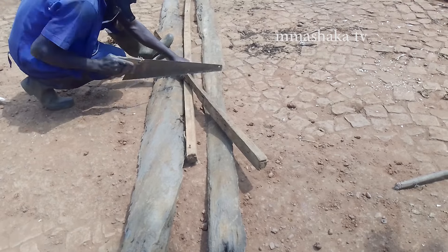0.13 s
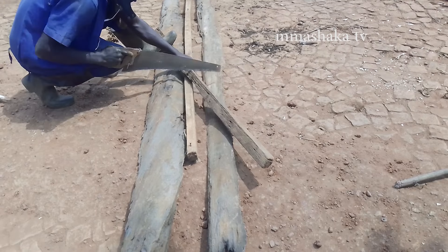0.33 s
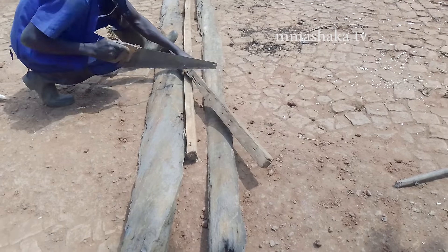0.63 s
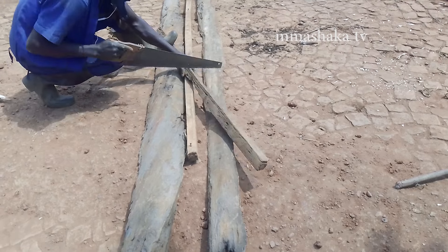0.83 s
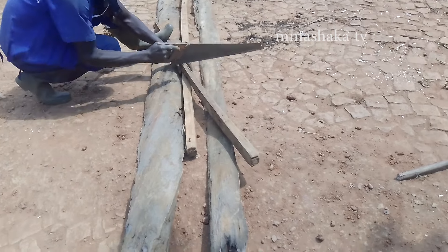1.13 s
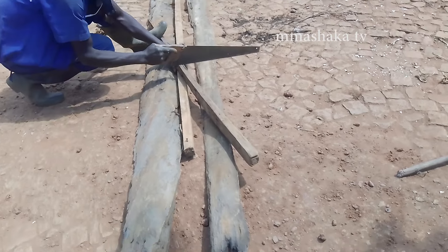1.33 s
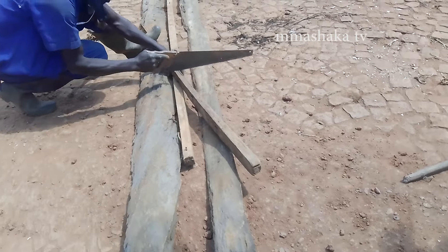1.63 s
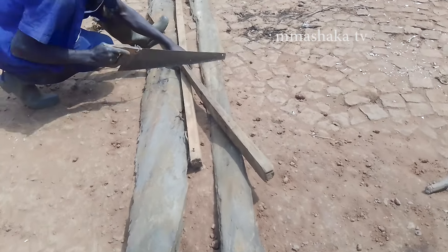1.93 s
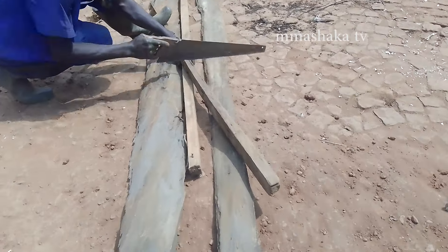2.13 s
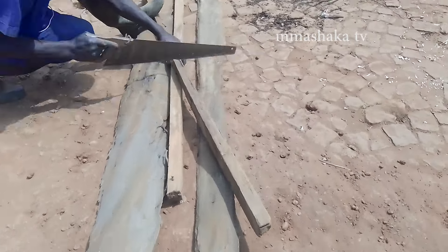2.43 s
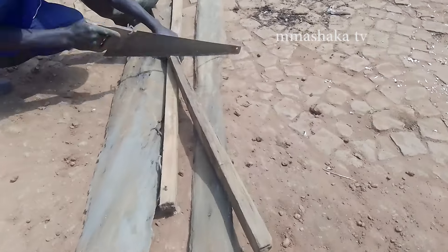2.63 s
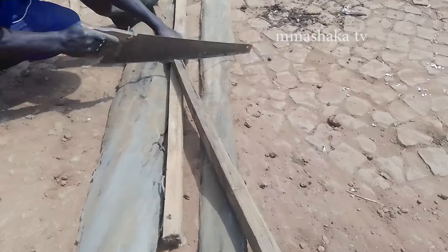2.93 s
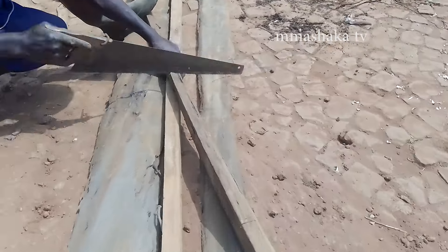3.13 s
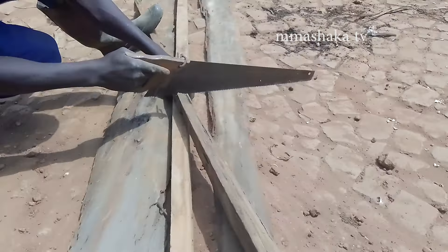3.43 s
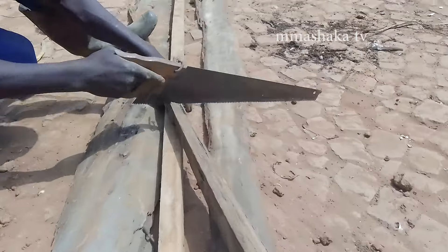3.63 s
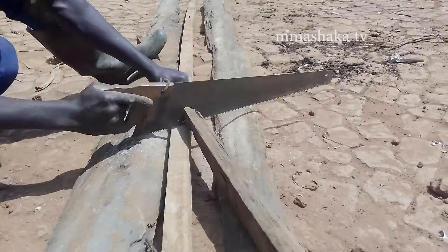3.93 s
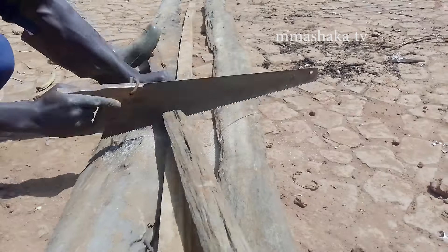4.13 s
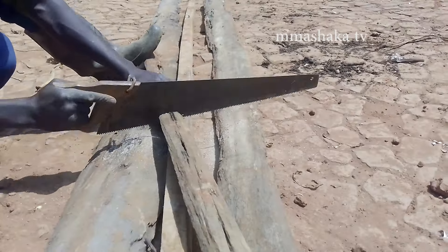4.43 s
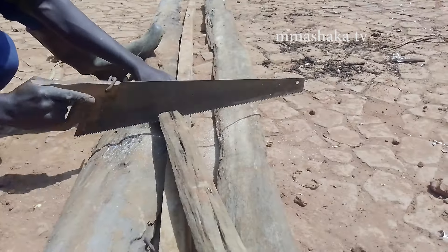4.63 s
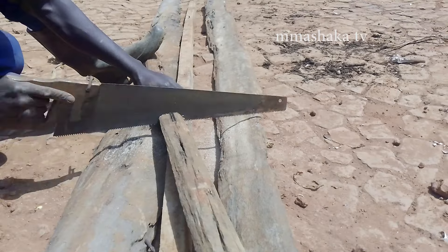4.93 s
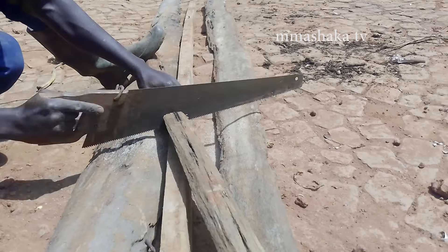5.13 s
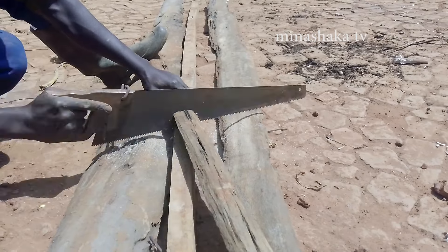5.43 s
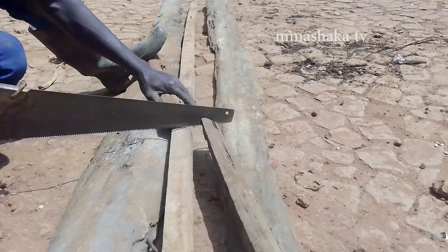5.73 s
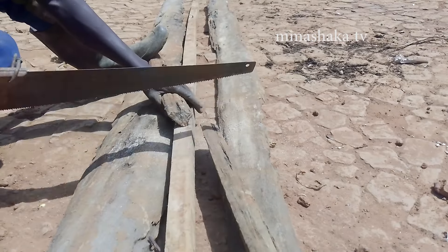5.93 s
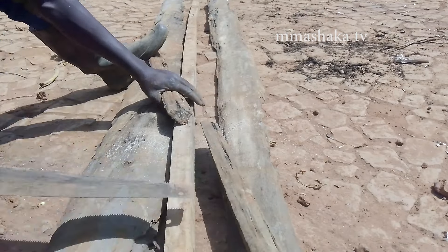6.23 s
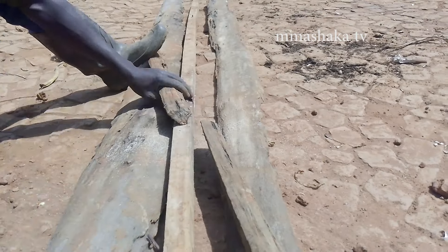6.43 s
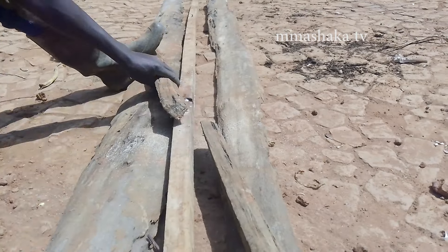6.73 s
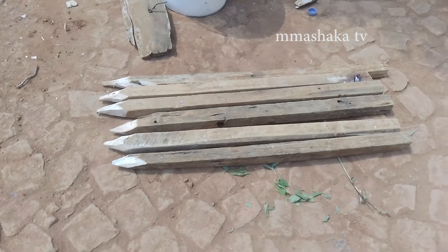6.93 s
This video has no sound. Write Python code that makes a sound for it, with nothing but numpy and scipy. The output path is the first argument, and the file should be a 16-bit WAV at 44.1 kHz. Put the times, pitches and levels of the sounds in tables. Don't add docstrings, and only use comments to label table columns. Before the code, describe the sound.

A hand saw rasps through a wooden bar in short uneven strokes with pauses, then the piece drops with a hard hollow knock outdoors.

```python
import sys
import numpy as np
from scipy import signal
from scipy.fft import rfft, irfft
from scipy.io import wavfile
from scipy.ndimage import uniform_filter1d

SR = 44100
rng = np.random.default_rng(int(sys.argv[2]) if len(sys.argv) > 2 else 0)


def boost(x):
    u = np.asarray(x, float) / 20
    return 10 ** u


def dump_mix(stems):
    frames = np.atleast_2d(stems).T
    limited = np.clip(frames, -1, 1)
    pcm = np.round(limited * 32767).astype(np.int16)
    wavfile.write(sys.argv[1], SR, pcm)


N = 313851

# [pitch_hz, level_db per Hz]
RASP_COLOUR = [(1410, -28), (2400, -5), (3260, -9.5), (4010, -3.5), (4520, -13.5), (5480, -5.5),
               (6130, -4.5), (7440, 1), (10500, -9.5), (11700, -4), (12900, -22), (14100, -15.5),
               (14900, -17.5), (15700, -10)]
# [pitch_hz, width_hz, level_db]
STEEL_MODES = [(3420, 25, -7), (4165, 22, 0), (5600, 88, 5.5), (6330, 150, 1.5), (7350, 230, 5),
               (7630, 40, -4.5), (9350, 70, -1.5), (10540, 58, -10.5), (11700, 200, -11.5), (14500, 60, -8)]
# [pitch_hz, width_hz, level_db]
SECOND_BAR_LOW = [(270, 150, -11), (337, 69, -0.5), (390, 50, -1.5), (467, 36, 2), (613, 72, -1),
                  (742, 54, -1.5), (810, 7.5, 5), (865, 170, -5)]
# [pitch_hz, width_hz, level_db]
SECOND_BAR_HIGH = [(1044, 76, 0.5), (1247, 59, 4), (1503, 110, -2), (1586, 79, -4), (1850, 100, 4.5),
                   (2054, 55, 4), (2300, 81, -4.5)]
FULL_DB = -15.5
TOP_HZ = 12300


def evened(x):
    return x / np.sqrt(np.mean(x ** 2) + 1e-20)


def coloured(x, gain_db):
    hz = abs(np.fft.fftfreq(4096, 1 / SR))
    log_gain = np.maximum(gain_db(hz), -100) * np.log(10) / 20
    minimum_phase = np.exp(np.conj(signal.hilbert(log_gain)))
    taps = np.fft.ifft(minimum_phase).real[:2048]
    return signal.oaconvolve(x, taps)[:len(x)]


def read(points):
    f, db = np.transpose(points)
    return lambda hz: np.interp(np.log(hz + 1), np.log(f + 1), db)


def along(rows):
    s, *columns = np.transpose(rows)
    return [np.interp(np.arange(N) / SR, s, c) for c in columns]


def wander(fast_hz):
    b, a = signal.butter(2, fast_hz / SR * 2)
    return evened(signal.lfilter(b, a, rng.standard_normal(N)))


def ring(x, modes, widen=0.54, drift_db=0.):
    out = np.zeros(len(x))
    for k, (hz, width, db) in enumerate(modes):
        r = np.exp(-np.pi * max(width * widen, 10) / SR)
        drive = x * boost(drift_db * wander(14)) if drift_db else x
        poles = [1, -2 * r * np.cos(2 * np.pi * hz / SR), r * r]
        out += (-1) ** k * boost(db) * signal.lfilter([1 - r, 0, r - 1], poles, drive)
    return out


def nearest(modes, hz, fall_db):
    return [(f, width, db - fall_db * abs(np.log2(f / hz))) for f, width, db in modes]


def follow(x, hz, width):
    turn = np.exp(2j * np.pi * np.cumsum(hz) / SR)
    r = np.exp(-np.pi * width / SR)
    return 2 * (turn * signal.lfilter([1 - r], [1, -r], x / turn)).real


def add(mix, s, sound):
    part = mix[round(s * SR):][:len(sound)]
    part += sound[:len(part)]


def stroke_db(start, rise, hold, db, fall):
    rise_db, rise_bend, ease_s = 22, 1.42, 0.0095
    t = np.arange(N) / SR - start
    swell = -rise_db * np.clip(1 - t / max(rise, 1e-3), 0, 1) ** rise_bend
    late = np.maximum(t - rise - hold, 0)
    rounded_fall = -fall * (np.hypot(late, ease_s) - ease_s)
    slide = -22 - 130 * late
    level = db + swell + np.maximum(rounded_fall, slide)
    return np.where(t < 0, -140, np.maximum(level, -140))


def effort_db():
    # [start_s, rise_s, hold_s, level_db, fall_db per s]
    cuts = [(0.09, 0.06, 0.098, -26.5, 176), (1.829, 0.093, 0.068, -35, 210),
            (2.125, 0.13, 0.053, -31.5, 293), (2.412, 0.062, 0.11, -27, 221),
            (2.691, 0.11, 0.078, -22, 469), (2.965, 0.062, 0.081, -21.5, 241),
            (3.208, 0.084, 0.085, -20.5, 437), (3.902, 0.00099, 0.07, -15.5, 400),
            (4.724, 0.15, 0.042, -28, 334), (4.988, 0.099, 0.082, -20.5, 906.5),
            (5.215, 0.066, 0.095, -21.5, 448.5), (5.432, 0.11, 0.057, -19, 800),
            (5.722, .004, 0.08, -25, 244)]
    # [start_s, rise_s,
    # hold_s, level_db, fall_db per s]
    further_strokes = [(0.0, 0.00085, 0.001, -36, 1200), (2.93, .002, .05, -46.5, 200),
                       (5.243, .002, .03, -26, 300), (3.13, .01, .036, -33, 900), (0.02, .002, .05, -54, 99),
                       (0.093, 0.0038, .02, -39, 198), (1.795, 0.029, .03, -54.5, 200),
                       (2.202, 0.0012, 0.06, -29.5, 295), (2.7065, .002, .02, -39, 300),
                       (2.981, 0.0035, .02, -28, 300), (4.804, .002, .05, -30, 300),
                       (4.998, 0.0023, .03, -32.5, 300), (2.42, .002, .02, -49, 296),
                       (3.442, .002, 0.015, -48.5, 146), (4.105, 0.03, 0.086, -51.5, 252.5),
                       (4.281, 0.0013, 0.042, -59, 143), (4.663, 0.004, .01, -64, 400),
                       (4.695, 0.0027, .08, -60, 295), (5.176, 0.0051, 0.017, -38, 296),
                       (5.574, 0.0025, 0.05, -31, 400), (5.658, 0.0026, .01, -35.5, 152),
                       (6.251, 0.001, 0.025, -46, 800), (6.57, 0.0029, 0.036, -52.5, 91),
                       (6.725, .001, .003, -53, 1200), (6.773, 0.002, 0.0047, -51, 180)]
    strongest = np.max([stroke_db(*row) for row in cuts + further_strokes], axis=0)
    return uniform_filter1d(strongest, size=40)


def tearing(per_s, spread_db, bite_db, bind_db):
    snaps = boost(spread_db * np.minimum(rng.exponential(1, N), 3.5)) * rng.choice([-1., 1.], N)
    snaps *= rng.random(N) < per_s / SR
    clumps_db = bite_db * wander(320) + bind_db * wander(60)
    return snaps * boost(np.minimum(clumps_db, 4))


def flexing(x, top_db):
    hz, t, z = signal.stft(x, SR, nperseg=512)
    patches = uniform_filter1d(rng.standard_normal(z.shape), size=2, axis=0)
    patches = evened(uniform_filter1d(patches, size=7, axis=1))
    top = np.outer(hz > TOP_HZ, np.interp(t, np.arange(N) / SR, top_db))
    patchy_db = 3.5
    return evened(signal.istft(z * boost(patchy_db * patches + top), SR, nperseg=512)[1][:N])


def blade_rasp(scratch, free, rasp_db, second_scene):
    rasp = evened(coloured(evened(scratch) + boost(-14.0) * free, read(RASP_COLOUR)))
    top_per_db, brush_db = 0.5, -36
    top_db = np.maximum(top_per_db * (rasp_db - FULL_DB + 6), -3.5)
    top_db = top_db + np.clip(top_per_db * (brush_db - rasp_db), 0, 7)
    top_db = top_db + 3 * second_scene
    rasp = flexing(rasp, top_db)
    hollow_hz, hollow_width_hz = 3000, 1200
    light = np.clip(0.06 * (FULL_DB - rasp_db), 0, .62)
    return rasp - light * follow(rasp, np.full(N, hollow_hz), hollow_width_hz)


def bar_ring(rasp_db, second_scene):
    # [pitch_hz, width_hz, level_db]
    first_bar_low = [(209, 46, -12), (294, 93, -9.5), (406, 80, -1.5), (528, 45, 1.5), (630, 62, -3),
                     (734, 43, 1), (836.6, 17, 3), (977, 55, 2.5)]
    # [pitch_hz, width_hz, level_db]
    first_bar_high = [(1292, 39, -4.5), (1352, 13, -4.5), (1549, 47, -7.5), (1650, 14, -4), (1840, 120, -4.5),
                      (2120, 55, -3.5), (2438, 30, -19)]
    # [time_s, weight_db, lean_db to the upper modes]
    press = [
        [(0.0, -3, -0.5), (0.12, -1, 0), (0.25, -0.5, -1), (0.45, -7.5, 2.5), (0.7, -2, -4)],
        [(1.8, 4.5, 4), (1.93, 1.5, -2.5), (2.17, -1, 3.5), (2.3, -2.5, 2), (2.5, -1, -1), (2.85, -3.5, 2.5),
         (3.1, -1, -1), (3.33, -2, 2.5), (3.55, -5, -1)],
        [(3.95, -4.5, 3.5), (4.06, 4, -5.5), (4.2, 0, 5.5), (4.33, 8.5, 3), (4.47, 9, 5.5)],
        [(4.69, -7, 11.5), (4.8, 2, -2.5), (5.1, -3, 3.5), (5.3, 2.5, 1), (5.4, -1.5, -1), (5.53, 2, 0),
         (5.61, -13.5, 1.5), (5.69, 15.5, -9), (5.76, -1, 3)],
        [(6.0, 6.5, -6.5), (6.28, -18.5, 17.5), (6.6, -10.5, -1.5), (6.75, -18, 11), (6.8, -10.5, 6)],
    ]
    weight_db, lean_db = along(np.concatenate(press))
    eased_db = FULL_DB - rasp_db
    high_db = weight_db + np.minimum(-6.5 + 0.086 * eased_db, 4)
    low_db = weight_db + np.minimum(-11 + 0.35 * eased_db, 1.2)
    push = tearing(3000, 2.6, 3.0, 0.74)

    def bar(modes):
        return evened(ring(push, modes, widen=1.1, drift_db=1.8))

    high = np.where(second_scene, bar(SECOND_BAR_HIGH), bar(first_bar_high))
    low = np.where(second_scene, bar(SECOND_BAR_LOW), bar(first_bar_low))
    return boost(high_db + lean_db) * high + boost(low_db) * low


def saw():
    # [time_s, favoured_hz, ring_db over the rasp]
    blade = [(0.0, 8360, 7.5), (0.15, 7660, 1.5), (0.7, 8160, -14.5), (1.93, 6370, 1.5), (2.25, 7620, 0),
             (2.5, 7700, -1.5), (3.1, 7530, -13), (3.95, 7350, -11.5), (4.2, 7450, 6.5), (4.4, 6590, -17),
             (4.69, 9030, -6.5), (5.1, 7900, -8.5), (5.4, 8920, -10.5), (5.6, 7760, -5.5), (5.78, 7840, -8),
             (6.28, 5300, -11), (6.6, 9270, -6.5), (6.8, 7900, -3)]
    rasp_db = effort_db()
    second_scene = np.arange(N) / SR >= 3.8
    free_hz, ring_db = along(blade)
    scratch = tearing(10000, 2.3, 2.3, .8)
    free = evened(follow(scratch, free_hz, 1900))
    rasp = blade_rasp(scratch, free, rasp_db, second_scene)
    steel = evened(ring(evened(scratch) + boost(1.5) * free, STEEL_MODES, widen=1.8, drift_db=3.5))
    return boost(rasp_db - 3.5) * (rasp + boost(ring_db) * steel + bar_ring(rasp_db, second_scene))


def singing():
    # [start_s, length_s, pitch_hz, level_db]
    bar_sings = [(0, 0.081, 470, -59), (0, 0.069, 940, -62), (0.108, .12, 635, -50),
                 (0.102, 0.17, 893, -42), (.1, .12, 1306, -46.5), (.15, .1, 2083, -44),
                 (0.199, 0.16, 940, -48.5), (0.201, 0.16, 472, -50), (0.362, .2, 1880, -74),
                 (3.43, .16, 270, -70), (.665, .12, 800, -73), (1.845, 0.21, 1548, -53.5),
                 (2.156, 0.214, 1503, -49), (2.153, 0.22, 2097, -48), (2.45, .2, 2084, -53.5),
                 (2.46, 0.13, 1296, -47.5), (2.712, .1, 514, -47), (2.782, 0.14, 875, -41),
                 (2.789, .12, 2140, -37), (2.999, 0.22, 1930, -49), (3.016, .12, 1280, -41.5),
                 (3.239, .17, 1920, -36), (3.26, .17, 778, -45.5), (3.902, 0.046, 783, -31.5),
                 (3.902, 0.12, 2042, -33), (3.942, .09, 902, -32.5), (3.974, .07, 740, -37),
                 (4.114, 0.23, 310, -59), (4.133, .18, 885, -57.5), (4.207, .08, 1220, -56),
                 (4.75, .2, 442, -44), (4.8, .15, 2400, -51.5), (4.793, 0.098, 750, -52),
                 (5.005, 0.089, 700, -47.5), (4.998, .08, 2507, -47), (5.094, 0.055, 1470, -30.5),
                 (5.053, 0.1, 2031, -33), (5.214, .17, 438, -41.5), (5.296, .05, 1257, -34),
                 (5.307, .04, 1860, -32.5), (5.1, 0.067, 1850, -35.5), (5.473, .1, 2067, -36.5),
                 (5.495, 0.069, 844, -35), (5.497, .07, 1520, -42), (5.49, .11, 2632, -41.5),
                 (5.548, 0.07, 368, -43.5), (5.725, .17, 1258, -39), (5.743, 0.137, 1850, -43.5),
                 (5.777, 0.13, 714, -40.5), (5.718, .1, 2000, -46), (5.73, 0.068, 2586, -46)]
    # [start_s, length_s, pitch_hz, level_db]
    blade_sings = [(.16, .08, 5670, -40), (6.57, .07, 4100, -71), (1.854, .2, 11430, -56),
                   (1.865, .15, 5530, -47), (2.718, .1, 11660, -46), (3.902, .08, 3735, -38.5),
                   (3.902, .1, 5430, -36.5), (4.098, .27, 7300, -51), (4.12, .25, 5600, -62),
                   (4.14, .12, 8100, -58), (4.14, .12, 7540, -55), (4.14, .12, 6680, -63),
                   (4.122, .3, 4090, -69), (4.68, .14, 9220, -59), (4.697, .12, 7570, -53),
                   (4.675, .13, 4124, -69), (4.675, .13, 5320, -67), (4.804, .15, 11050, -67),
                   (5.03, .13, 4190, -47), (5.206, .1, 6860, -37), (5.306, .1, 10250, -39.5),
                   (5.73, .07, 7530, -37.5), (6.262, .03, 11300, -60), (6.248, .07, 4090, -65),
                   (6.568, .15, 9380, -63), (6.568, .1, 8900, -62.5), (6.6, .08, 10540, -75),
                   (6.767, .11, 7590, -63.5), (6.764, .12, 9300, -68), (6.775, .1, 5700, -62),
                   (6.774, 0.06, 4150, -61), (0, 0.051, 5670, -54)]
    bar_width_hz, blade_width_hz = 32, 100
    rows = [(*row, bar_width_hz) for row in bar_sings]
    rows += [(*row, blade_width_hz) for row in blade_sings]
    out, drive = np.zeros(N), tearing(5000, 2.5, 2.5, 1.5)
    for s, length, hz, db, width in rows:
        part = drive[round(s * SR):][:round(length * SR)]
        tone = evened(ring(part, [(hz, width, 0)], widen=0.72))
        swell = np.sin(np.linspace(.15, np.pi, len(part))) ** 0.6
        add(out, s, boost(db + 2.0) * tone * swell)
    return out


def air():
    # [pitch_hz, level_db per Hz]
    hush_colour = [(20, -20), (100, -21.5), (150, -35.5), (260, -10), (600, -10.5), (1100, -14),
                   (1900, -11), (2700, -24.5), (4000, -14), (4700, -17), (7700, -2), (10400, -15.5),
                   (13100, -14), (15500, -11.5)]
    # [time_s, level_db]
    hush_level = [(0.5, -66), (1.3, -69.5), (3.7, -65.5), (4.6, -68.5), (6.2, -67.5), (6.55, -66)]
    z = rfft(rng.standard_normal(N)) * boost(read(hush_colour)(np.fft.rfftfreq(N, 1 / SR)))
    return evened(irfft(z, N)) * boost(along(hush_level)[0] + .8 * wander(12))


def rumble():
    # [time_s, level_db, half_length_s]
    gusts = [
        (1.097, -93, .12),
        (1.85, -86, .06),
        (2.15, -83.5, .05),
        (3.448, -81.5, .12),
        (3.645, -87.5, .12),
        (5.75, -80.5, .05),
    ]
    still_db, shake_db, shake_share = -103, -79, 0.52
    band = signal.butter(2, [60, 135], "band", fs=SR, output="sos")
    low = signal.sosfilt(band, rng.standard_normal(N))
    smooth_db = uniform_filter1d(effort_db(), size=3000)
    shake = boost(shake_db + shake_share * (smooth_db - FULL_DB))
    t = np.arange(N) / SR
    wind = sum(boost(db) * np.exp(-((t - s) / half) ** 2) for s, db, half in gusts)
    out = evened(low) * boost(3.0 * wander(8)) * (boost(still_db) + shake + wind)
    thump_s, thump_db, thump_length_s = 3.902, -54, .012
    add(out, thump_s, boost(thump_db) * np.exp(-np.arange(4000) / SR / thump_length_s))
    return out


def yard(x):
    t = np.arange(SR // 3) / SR
    echoes = (rng.random(len(t)) < 2000 / SR) * rng.choice([-1., 1.], len(t))
    tail = echoes * boost(-60 * t / 0.053) * (t > .004)
    return signal.oaconvolve(x, tail / np.linalg.norm(tail))[:N]


def ticks():
    # [time_s, peak_db, centre_hz, ring_db over the tick]
    taps = [(0.645, -34, 10500, -11), (2.4059, -24, 6060, -3), (2.95, -25, 8500, 3),
            (4.0848, -34, 5600, -1), (4.2618, -38, 4300, -5.5), (4.6742, -39, 11800, 0),
            (4.7027, -37, 9450, -5), (4.7137, -37, 9260, -5), (4.1117, -34, 6870, -5), (4.18, -30, 7220, 2),
            (4.2284, -36, 7290, -1), (4.365, -49, 5930, -3), (0.06, -49, 6300, -12), (0.385, -40, 5020, -8),
            (5.208, -10, 6600, -2), (6.2524, -29, 3420, 7), (6.273, -33, 4100, 4), (6.317, -61, 15120, -13),
            (6.334, -43, 4100, 3), (6.671, -49, 2900, -12), (6.575, -50.5, 2900, -12),
            (6.573, -44, 9350, -5), (6.574, -43, 14800, -17), (6.6168, -32, 9330, -8),
            (6.726, -37, 9420, -8), (6.7753, -28, 9400, 1)]
    # [time_s, peak_db, centre_hz]
    catches = [(0.134, -13.5, 7550), (0.173, -15, 7470), (0.212, -5, 7210), (0.3, -18, 6500),
               (0.326, -29, 5800), (0.342, -38, 5740), (1.8844, -36, 8020), (1.899, -36, 5570),
               (1.926, -24, 5610), (1.961, -10, 6300), (1.969, -18.5, 7500), (2.235, -19, 5540),
               (2.7222, -24, 8180), (3.4033, -17, 8460), (4.7671, -36, 9230), (4.806, -33, 7000),
               (4.8354, -30, 9370), (5.4411, -29, 9330), (5.47, -24.5, 9220), (5.5049, -17.5, 8130),
               (5.5293, -13.5, 9300), (5.845, -28, 7000), (5.866, -29.5, 6000), (5.888, -31.5, 7000),
               (2.203, -27, 7830), (2.4448, -15, 7540), (2.7065, -28.5, 7870), (2.784, -15.5, 8110),
               (2.838, -11.5, 8100), (3.043, -9, 7350), (3.0654, -10, 8330), (3.082, -10.5, 7270),
               (3.1204, -15.5, 9500), (3.237, -25.5, 9100), (4.976, -24, 9400), (4.9928, -14, 9460),
               (5.022, -22, 9070), (5.036, -12.5, 11400), (5.0446, -10, 7670), (5.5774, -11.5, 7500),
               (5.5874, -4.5, 8890), (5.597, -17, 8750), (5.615, -17, 7150), (5.665, -19, 3750),
               (5.684, -25, 6520), (5.7953, -17.5, 7570), (5.8176, -7.5, 9790), (5.9224, -31, 7330)]
    # [time_s, peak_db]
    grit = [(0.7594, -51), (0.835, -49), (0.91, -50), (1.4232, -51), (1.571, -50), (1.5998, -51),
            (1.6417, -50.5), (1.76, -46), (1.775, -45), (1.819, -42), (3.5206, -44), (6.1365, -52),
            (6.4515, -43)]
    tap_t60, catch_t60 = 0.035, 0.032
    rows = [(*row, tap_t60) for row in taps]
    rows += [(*row, -11, catch_t60) for row in catches]
    rows += [(*row, 8000, -7, tap_t60) for row in grit]
    out, t = np.zeros(N), np.arange(6000) / SR
    for s, db, hz, steel_db, t60 in rows:
        burst = rng.standard_normal(len(t)) * boost(-60 * t / t60) * np.minimum(t / 0.001, 1)
        tick = evened(coloured(burst, lambda f: 0.59 * read(RASP_COLOUR)(f)
                               - 13 * abs(np.log2((f + 1) / hz))))
        steel = evened(ring(burst, nearest(STEEL_MODES, hz, 8.0), widen=.8))
        tick += boost(steel_db) * steel
        add(out, s - .001, boost(db - 2.0) * tick / abs(tick).max())
    return out


def knocks():
    # [time_s, peak_db, favoured_hz, t60_s]
    blows = [(0.614, -60, 1200, 0.03), (0.672, -55, 470, 0.4), (0.758, -57, 430, 0.12),
             (0.759, -52, 1700, 0.06), (1.049, -58.5, 630, 0.12), (1.421, -61, 910, 0.12),
             (1.553, -63, 350, 0.034), (1.693, -55, 900, 0.03), (3.67, -53, 810, 0.067),
             (3.823, -58.5, 1710, 0.076), (4.307, -23, 458, 0.14), (5.666, -2, 783, 0.14),
             (6.06, -39, 717, 0.22), (6.252, -37, 1126, 0.16), (6.614, -45, 810, 0.15),
             (6.671, -55, 860, 0.12), (6.728, -43, 2160, 0.1), (6.742, -43, 850, 0.1),
             (6.757, -45, 867, 0.12), (6.777, -44, 870, 0.2)]
    out, t = np.zeros(N), np.arange(10000) / SR
    for s, db, hz, t60 in blows:
        rattle = 0.07 * rng.standard_normal(len(t)) * np.exp(-t / .03)
        blow = t / 0.0002 * np.exp(-t / 0.0001) + rattle
        thump = ring(blow, [(hz, 0.65 * hz, 0), (1.92 * hz, 1.4 * hz, 0), (0.63 * hz, 0.39 * hz, -4)])
        spot = ring(blow, [(hz, 35, 0)])
        bar = ring(blow, nearest(SECOND_BAR_LOW + SECOND_BAR_HIGH, hz, 6.0), widen=1.2)
        wood = evened(thump) + boost(-4.0) * evened(spot) + boost(-1.0) * evened(bar)
        wood *= boost(-30 * t / max(t60, .01))
        add(out, s - .001, boost(db - 4.0) * wood / abs(wood).max())
    return out


def pings():
    # [time_s, pitch_hz, level_db, t60_s]
    tones = [(4.419, 1806, -58.5, 0.31), (4.271, 5000, -67, 0.24), (6.253, 1150, -45, 0.13),
             (6.255, 700, -56.5, 0.33), (6.255, 2000, -53, 0.17), (5.668, 764, -26, 0.25),
             (5.668, 812, -25, .3), (5.668, 903, -25, .2), (0.908, 11700, -66, .25),
             (0.908, 6300, -60, .12), (5.6, 2700, -45.5, .12), (6.6, 859, -53, 0.2), (6.742, 853, -50, .09),
             (6.256, 3450, -58, 0.15), (6.254, 4150, -53, .12), (6.34, 5700, -57, 0.098),
             (6.62, 11800, -70, .5), (6.62, 5700, -58, .2), (6.777, 13700, -63, 0.89)]
    out, t = np.zeros(N), np.arange(SR // 2) / SR
    for s, hz, db, t60 in tones:
        fade = boost(db - 60 * t / t60) * np.minimum(t / 0.003, 1)
        add(out, s, fade * np.sin(2 * np.pi * hz * t))
    return out * boost(2.0 * wander(60))


def scene():
    near = saw() + singing() + ticks() + knocks() + pings()
    near = signal.sosfilt(signal.butter(8, 209, "high", fs=SR, output="sos"), near)
    echoes = boost(-19) * yard(near)
    return (near + echoes + air() + rumble())[None]


def microphone_port(x):
    # [pitch_hz, width_hz, level_db]
    port = [(2052, 1300, -0.5), (3970, 700, 3.5), (4600, 270, -2.5), (2900, 650, 1), (7350, 1100, -6),
            (9220, 370, 6), (11400, 250, 2.5), (13000, 700, -4), (15510, 400, 2.5)]
    return coloured(x, lambda hz: sum(db / (1 + (2 * (hz - f) / width) ** 2) for f, width, db in port))


def masked(x):
    hz, _, z = signal.stft(x, SR, nperseg=1024)
    power = uniform_filter1d(abs(z) ** 2, size=7, axis=1)
    bright = power[(hz > 7000) & (hz < TOP_HZ)].mean(0)
    bands = power[1:].reshape(-1, 4, power.shape[1]).mean(1)
    bands = np.vstack([power[:1], np.repeat(bands, 4, axis=0)])
    weak = bands < bright * boost(2 * -20.5)
    top = ((hz > TOP_HZ) & (hz < 15300))[:, None]
    return signal.istft(np.where(weak & top, 0, z), SR, nperseg=1024)[1][:N]


def band_limit(x):
    return signal.sosfilt(signal.butter(12, 15950, fs=SR, output="sos"), x)


def record(dry):
    heard = microphone_port(dry[0])
    top_edge = signal.firwin(1201, 15800, window=("kaiser", 7), fs=SR)
    heard = signal.oaconvolve(heard, top_edge, "same")
    heard = masked(.9 * np.tanh(heard / .9))
    end_s, fade_s = 6.905, 0.0045
    heard *= np.clip((end_s - np.arange(N) / SR) / fade_s, 0, 1)
    return band_limit(heard[None])


dry = scene()
out = record(dry)
dump_mix(out)
```